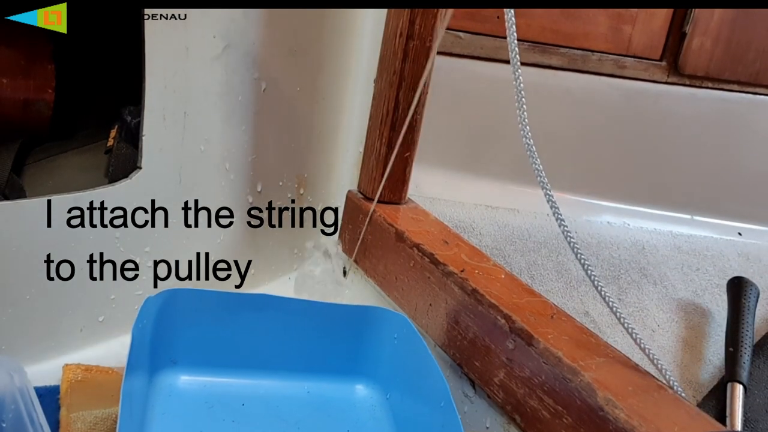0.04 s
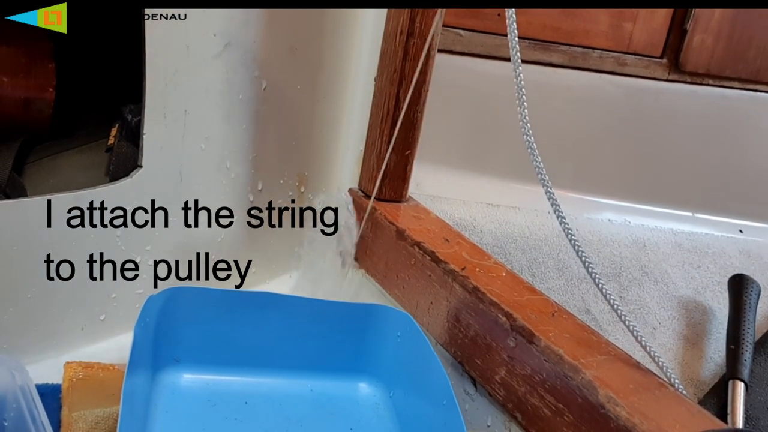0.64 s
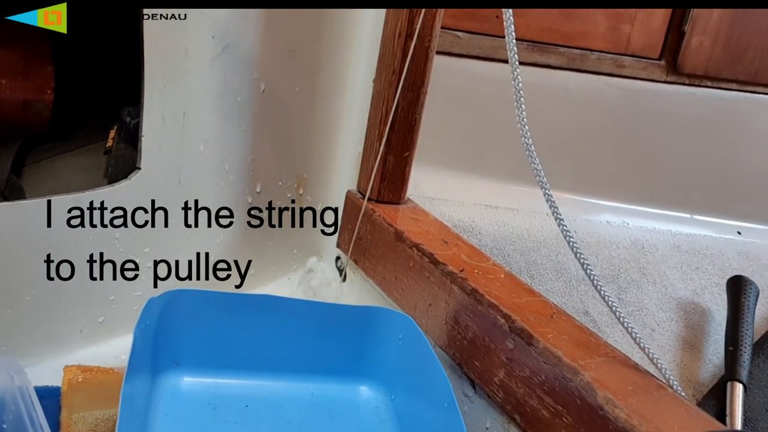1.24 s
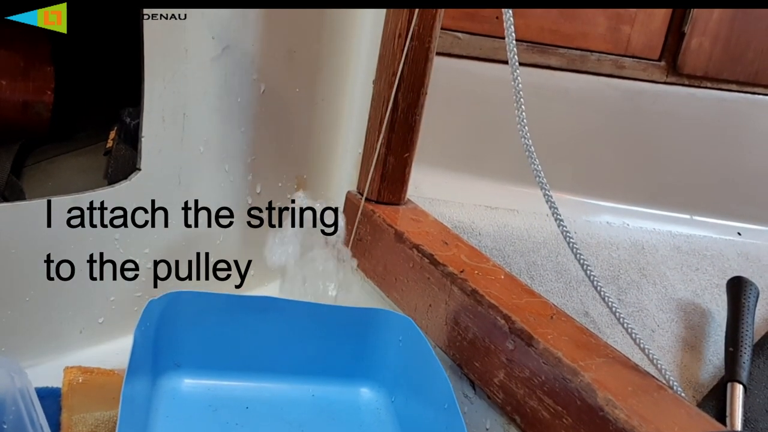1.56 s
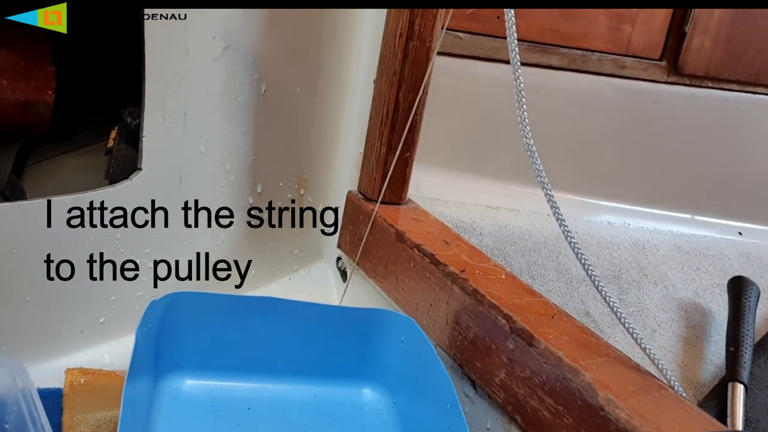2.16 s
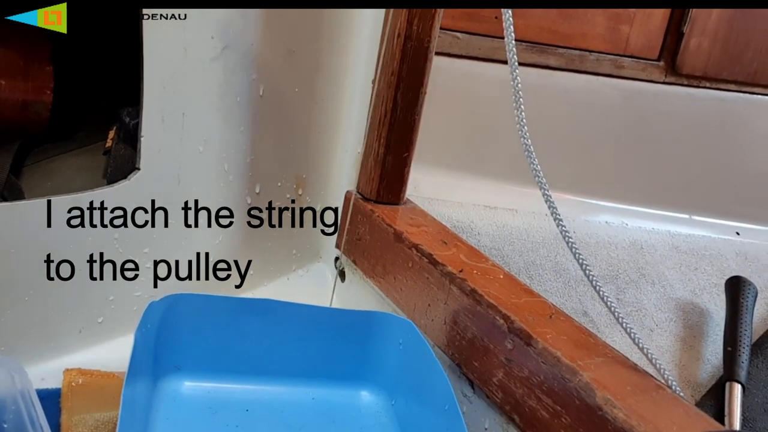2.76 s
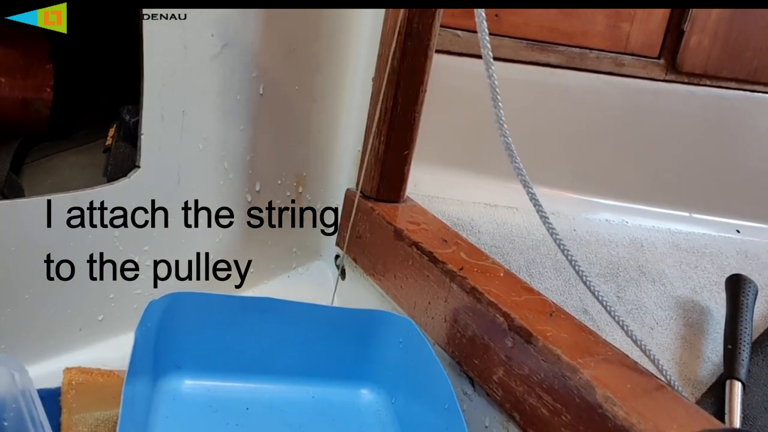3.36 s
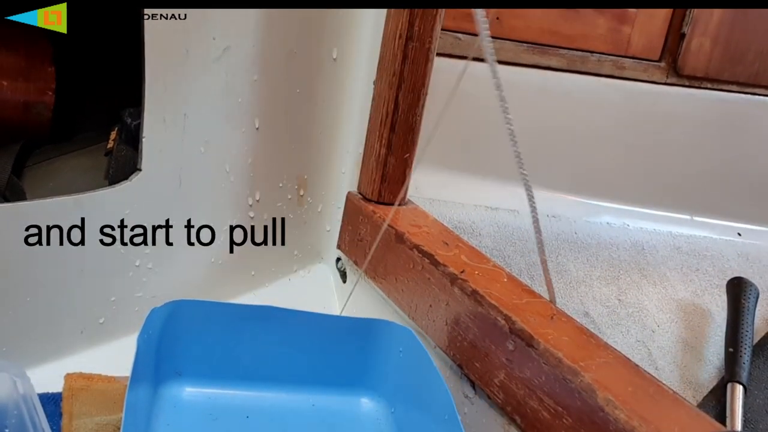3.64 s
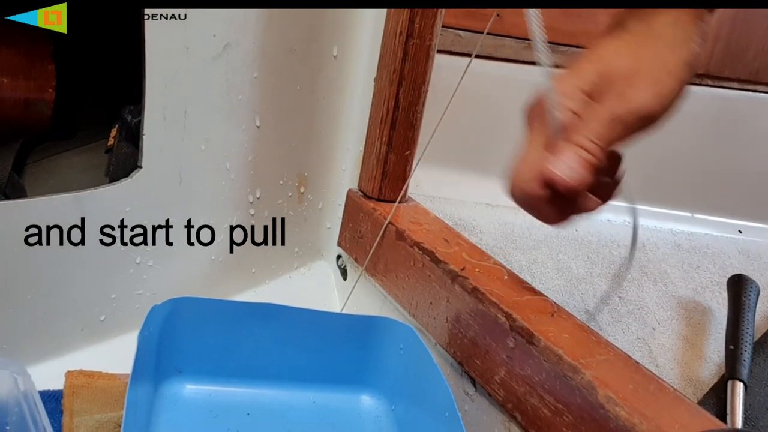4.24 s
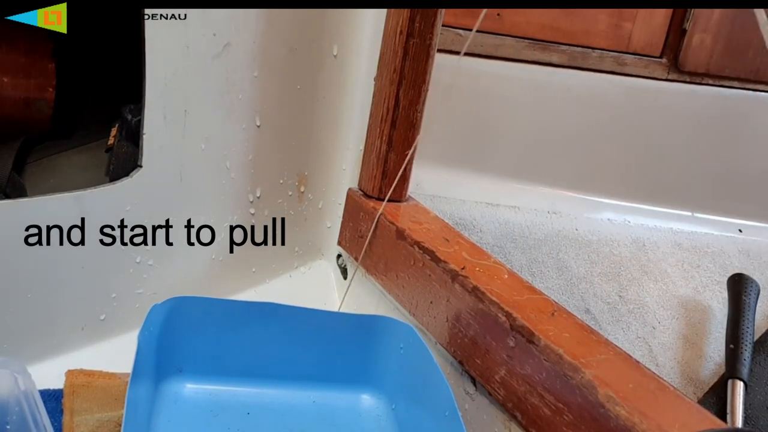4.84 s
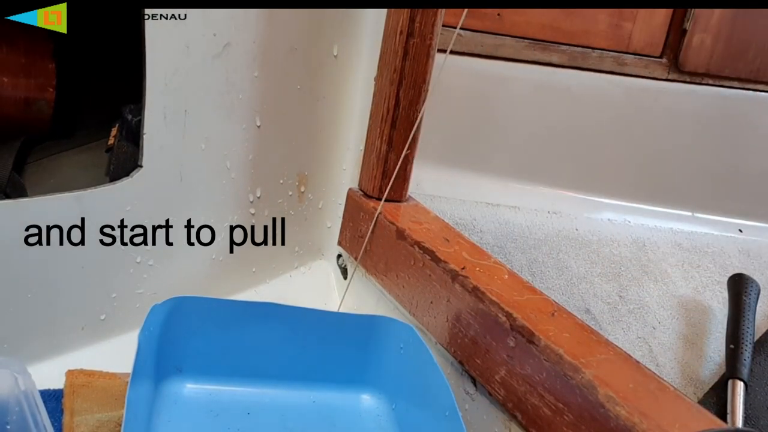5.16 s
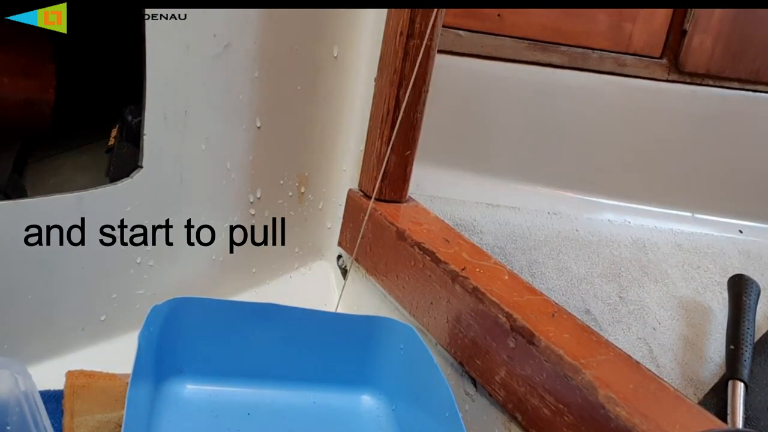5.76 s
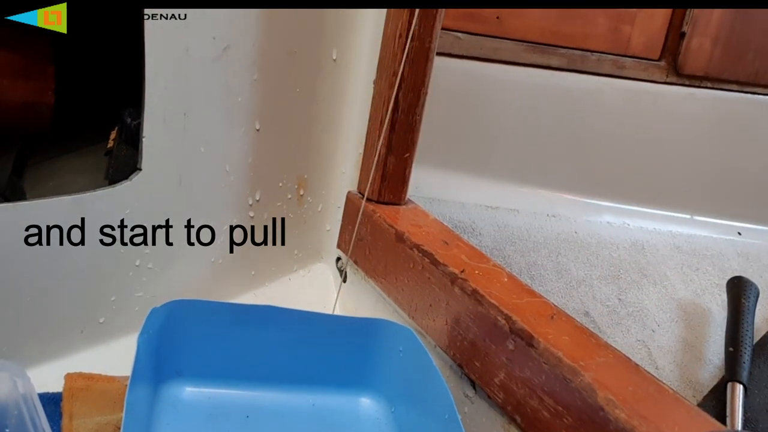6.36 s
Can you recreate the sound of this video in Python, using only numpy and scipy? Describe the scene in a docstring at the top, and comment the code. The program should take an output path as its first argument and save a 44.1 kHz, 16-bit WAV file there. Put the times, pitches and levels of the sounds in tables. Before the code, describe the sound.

Water spurts in through a small hole in a boat hull, splashing and bubbling, with two deep gulps, then thins to a spitting trickle and stops. A string is hauled over a pulley with a soft hiss, a low hum and small rattles, and snaps tight. A board creaks, and gear knocks on the woodwork with a deep thump. Everything is heard close up in a cramped cabin.

```python
"""Water spurts in through a small hole in a boat hull, with two deep gulps, and thins to a spitting trickle.
Its drops are noise impulses; the air it traps rings as bubbles. Then a string is hauled over a pulley:
friction makes it hiss and drives a drone in the hull. It snaps tight, a board creaks, and gear knocks
on the woodwork, exciting damped modes. All is heard close up, in stereo, in a cramped, hard-walled cabin."""
import sys
import numpy as np
from scipy import signal
from scipy.fft import rfft, irfft
from scipy.io import wavfile
from scipy.ndimage import uniform_filter1d

SR = 44100
rng = np.random.default_rng(int(sys.argv[2]) if len(sys.argv) > 2 else 0)


def master_out(mix):
    """Clip the mix to full scale and print it as 16-bit PCM to the path in sys.argv[1]."""
    frames = np.transpose(np.atleast_2d(mix))
    ceiling = np.clip(frames, -1, 1)
    pcm = np.round(ceiling * 32767).astype(np.int16)
    wavfile.write(sys.argv[1], SR, pcm)


N = 291060
TIME = np.arange(N) / SR

# the jet, dwindling from gush to trickle: time_s, spray_db, churn_db, bubble_pitch_hz
JET_FLOW = [(0, -42, -49, 1640), (0.32, -39, -38.5, 1414), (0.88, -47, -36.5, 1410),
            (0.98, -54, -51.5, 800), (1.25, -46.5, -42, 1197), (1.68, -42.5, -42.5, 1230),
            (1.87, -52, -56.5, 1220), (2.2, -43, -55, 1700), (2.32, -50.5, -70, 2650),
            (3.54, -48, -88, 2700), (3.63, -81, -58, 2800), (3.802, -77, -85, 2300)]
# the jet surges (+) or falters (-): start_s, length_s, change_db
JET_SURGES = [(0.32, 0.1, 5.5), (0.516, 0.019, -8.5), (0.623, 0.072, 7), (0.801, 0.12, 5),
              (1.284, 0.052, 4), (1.489, 0.24, 4), (1.678, 0.025, -6.5), (1.727, 0.04, 10),
              (1.778, 0.035, 0.5), (2.721, 0.06, -11), (2.973, 0.02, -5.5), (3.023, 0.043, -3.5),
              (3.113, 0.02, -6), (3.214, 0.065, -13)]
# spectrum of the spray: frequency_hz, level_db
SPRAY_SPECTRUM = [(880, -14.5), (1500, 13.5), (1670, -43.5), (1930, 13.5), (2110, -18), (2350, 16),
                  (3000, 0), (4080, 2), (8420, -6.5), (11000, -14.5), (14300, -48.5), (22000, -120)]
def inflow():
    """Drop impact and air entrainment: a stronger jet sprays harder and tears off smaller bubbles."""
    spray_db, churn_db, pitch_hz = curves(JET_FLOW)
    surge_db = sum(db * push(start, length, rise_s=0.017, t60=0.14) for start, length, db in JET_SURGES)
    spray_db += surge_db
    churn_db += 1.61 * surge_db
    pitch_hz *= 2 ** (0.24 * surge_db)

    drops = reflections(patter(per_s=280, spread_db=5, t60=0.024), echo_db=1)
    spray = steady(shaped(drops, SPRAY_SPECTRUM), 0.19)
    sharp_drops = reflections(patter(per_s=120, spread_db=11.5, t60=0.042), echo_db=-22.5)
    all_drops = unit(drops) + amp(-7) * unit(sharp_drops)
    mist = steady(shaped(all_drops, [(5000, -13.5), (8500, -4), (16000, -0.5)]), 0.22)
    wash = steady(shaped(drops, [(250, -26), (650, -4.5), (1400, 5.5), (2400, -16.5), (4000, -25)]), 0.096)

    churn = bubble_swarm(pitch_hz, per_s=160, octaves=0.589, cycles=35, max_rise=18, spread_db=21)
    churn = steady(cabin(churn, wet_db=-10.5), 0.045)
    fizz = bubble_swarm(np.full(N, 3650), per_s=520, octaves=0.9, cycles=60, max_rise=35, spread_db=22)
    fizz = steady(cabin(reflections(fizz, echo_db=-10), wet_db=-8), 0.1)
    pings = bubble_swarm(np.full(N, 8200), per_s=200, octaves=0.55, cycles=70, max_rise=20, spread_db=22)
    pings = steady(reflections(pings, echo_db=-10), 0.15)

    force = np.clip((spray_db + 49) / 12, 0, 1)  # a strong jet splashes steadily, a weak one spits
    spitting = force + (1 - force) * slugs(per_s=28, floor_db=-11, t60=0.09)
    water = amp(spray_db) * spitting * (amp(-13.5 + 5.3 * force) * spray + amp(1 - 3.7 * force) * fizz)
    water += amp(spray_db - 7 - 7.9 * force) * (mist + amp(-2) * pings)
    water += amp(churn_db) * (amp(-7.5) * wash + amp(-8) * churn)
    end_s = JET_FLOW[-1][0]
    return water * np.interp(TIME, [end_s, end_s + 0.05], [1, 0])


def slugs(per_s, floor_db, t60):
    """Jet break-up: a thin jet parts into slugs, and the gain jumps with each and sinks between them."""
    starts = np.cumsum(rng.uniform(0.35, 1.65, 400)) / per_s
    latest = np.maximum(np.searchsorted(starts, TIME) - 1, 0)
    strength = rng.uniform(0.17, 1, 400)[latest]
    return unit(amp(floor_db) + strength * ring(abs(TIME - starts[latest]), 0.0013, t60))


def bubble(hz, octaves_per_s, t60, swell_s, bearing, size=6000):
    """Bubble resonance: trapped air pulsates, and its pitch rises as it nears the surface."""
    t = TIME[:size]
    turns = np.cumsum(np.minimum(hz * 2 ** (octaves_per_s * t), SR / 2)) / SR
    stereo_phase = np.array([[1], [-1]]) * bearing * min(hz / 900, 1.5)
    return ring(t, swell_s, t60) * np.sin(2 * np.pi * turns + stereo_phase)


def bubble_swarm(pitch_hz, per_s, octaves, cycles, max_rise, spread_db):
    """Constant-Q damping: all bubbles ring for as many cycles, so the small, high ones die sooner."""
    out, end_s = np.zeros((2, N)), JET_FLOW[-1][0]
    for when, tone, strength, side, lift, chance in rng.random((3000, 6)):
        if chance < per_s * end_s / 3000:
            hz = pitch_hz[int(when * end_s * SR)] * 2 ** (octaves * (2 * tone - 1))
            note = bubble(hz, max_rise * lift, cycles / hz, 0.91 / hz, 2 * side - 1, size=3000)
            add(out, when * end_s, amp(spread_db * strength) * note)
    return out


# water washing against the hull: start_s, length_s, level_db
SLOSH_EVENTS = [(0.27, 0.5, -59), (1.49, 0.27, -56.5), (1.873, 0.22, -53), (2.366, 0.089, -49),
                (2.857, 0.039, -58), (3.441, 0.092, -49.5)]
# its spectrum: frequency_hz, level_db
SLOSH_SPECTRUM = [(70, -11.5), (120, -11), (200, 12), (260, -2), (450, -8), (800, -21.5), (1500, -54)]
def sloshes():
    """Amplitude-modulated noise: a low wash swells and fades as water meets the hull."""
    swell = sum(amp(db) * push(start, length, rise_s=0.055, t60=0.58) for start, length, db in SLOSH_EVENTS)
    return swell * noise(SLOSH_SPECTRUM)


# single large bubbles: start_s, level_db, pitch_hz, t60_s
LARGE_BUBBLES = [(0.188, -35, 1287, 0.06), (0.311, -11.5, 1075, 0.03), (0.349, -19, 1360, 0.035),
                 (0.448, -30.5, 635, 0.06), (0.635, -22, 1920, 0.03), (0.661, -22, 1180, 0.07),
                 (0.674, -24, 1400, 0.03), (0.822, -21.5, 1804, 0.055), (0.839, -26.5, 636, 0.022),
                 (0.892, -13.5, 1160, 0.025), (0.917, -22, 822, 0.04), (0.975, -36, 730, 0.03),
                 (1.045, -36, 680, 0.04), (1.102, -30.5, 674, 0.055), (1.126, -34.5, 643, 0.08),
                 (1.15, -28, 1370, 0.06), (1.163, -29.5, 916, 0.048), (1.19, -29, 1300, 0.038),
                 (1.228, -38, 1320, 0.037), (1.259, -28, 698, 0.043), (1.393, -28.5, 1185, 0.025),
                 (1.491, -26.5, 1102, 0.06), (1.53, -21.5, 705, 0.04), (1.602, -36, 1272, 0.03),
                 (1.623, -25, 1375, 0.037), (1.666, -15, 635, 0.04), (1.829, -22.5, 805, 0.028),
                 (1.887, -33, 1193, 0.037), (1.98, -27, 701, 0.095), (2.225, -33.5, 720, 0.08)]
def plops():
    """Free oscillation: each large bubble rings out as one damped, rising note."""
    out = np.zeros((2, N))
    for start, db, hz, t60 in LARGE_BUBBLES:
        note = bubble(hz, octaves_per_s=11, t60=t60, swell_s=2.1 / hz, bearing=rng.uniform(-1.1, 1))
        add(out, start, amp(db - 2) * note)
    return out


def splat(hz, octaves, t60=0.075, count=7):
    """Impact and entrainment: a slap of band noise traps a handful of ever fainter bubbles."""
    def band(f):
        return (1 / (1 + (np.log2(f / hz) / octaves) ** 4) + amp(-20)) / (1 + (900 / f) ** 2)
    out = amp(-12.5) * burst(band, 0.00061, t60)
    for k, (when, tone, bearing) in enumerate(rng.uniform(-1.2, 1, (count, 3))):
        delay_s = max(k + 0.5 * when, 0) / count * t60 * 0.59
        pitch_hz = hz * 2 ** (0.8 * octaves * tone * min(k, 1))  # the first bubble sits at the centre
        note = bubble(pitch_hz, octaves_per_s=28, t60=95 / pitch_hz, swell_s=0.00064, bearing=bearing)
        add(out, delay_s, amp(-9 - 4.7 * k) * note)
    return out


# slaps of water, from broad smacks to pitched drips: start_s, level_db, centre_hz, width_octaves
WATER_SLAPS = [(0.2388, -36, 2577, 0.6), (0.3294, -33, 2240, 0.69), (0.349, -22, 2100, 0.56),
               (0.389, -19.5, 3850, 0.55), (0.5577, -15.5, 2200, 0.85), (0.5964, -16, 5300, 1),
               (0.7485, -21, 3280, 0.54), (0.8676, -23.5, 2550, 0.65), (0.8843, -14.5, 2440, 0.42),
               (1.3176, -35, 2030, 0.26), (1.5287, -16.5, 2170, 0.97), (1.717, -19.5, 2280, 0.55),
               (1.7374, -14.5, 2600, 0.78), (1.7606, -12.5, 3005, 0.67), (1.8279, -26, 1450, 0.76),
               (2.0243, -29.5, 2450, 1), (2.086, -25, 1820, 0.39), (2.1356, -28, 2510, 0.55),
               (2.1812, -23, 2230, 0.72), (2.263, -26.5, 3500, 0.75), (2.3757, -41, 2360, 0.48),
               (2.424, -31.5, 3300, 0.25), (2.53, -29, 2560, 0.29), (2.56, -25, 3280, 0.28),
               (2.592, -43.5, 1090, 0.95), (2.602, -27, 7300, 0.5), (2.6413, -27, 3200, 0.6),
               (2.7621, -28, 3730, 0.22), (2.791, -27.5, 3700, 0.54), (2.8683, -31.5, 6300, 0.2),
               (2.9326, -18.5, 3160, 0.95), (2.996, -37, 3580, 0.66), (3.0258, -26, 4850, 0.43),
               (3.087, -30.5, 2060, 1), (3.115, -43.5, 1075, 0.82), (3.152, -21, 2825, 0.69),
               (3.184, -24, 4370, 0.31), (3.263, -28, 4400, 1), (3.2782, -27, 2670, 0.54),
               (3.33, -31.5, 3620, 1), (3.375, -33.5, 2000, 0.45), (3.439, -30.5, 5650, 0.54)]
# single drops striking hard: start_s, level_db
HARD_DROPS = [(1.344, -21.5), (1.529, -20), (1.831, -25), (2.032, -30.5), (2.355, -37), (2.374, -29),
              (2.577, -26), (2.995, -31), (3.278, -26.5), (3.524, -51)]
def splashes():
    """Impact noise: slaps of water sound in a band, hard drops as bright, high-passed bursts."""
    out = np.zeros((2, N))
    for start, db, hz, octaves in WATER_SLAPS:
        add(out, start, amp(db) * splat(hz, octaves))
    for start, db in HARD_DROPS:
        add(out, start, amp(db - 4.5) * burst(lambda f: 1 / (1 + (4810 / f) ** 2), 0.0008, t60=0.042))
    return out


# air gulped through the hole: start_s, level_db, first_hz, last_hz, t60_s
AIR_GULPS = [(1.527, -18.5, 681, 192, 0.14), (2.02, -20.5, 454, 191.5, 0.15)]
def gulps():
    """Cavity resonance: the air pocket grows, so its note falls, amid a burst of low noise."""
    out, t = np.zeros((2, N)), TIME[:SR // 2]
    for start, db, first_hz, last_hz, t60 in AIR_GULPS:
        turns = np.cumsum(last_hz + (first_hz - last_hz) * np.exp(-t / 0.005)) / SR
        add(out, start, amp(db - 5.5) * ring(t, 0.0082, t60) * np.sin(2 * np.pi * turns))
        add(out, start, amp(db - 8) * burst(lambda f: 1 / (1 + np.log2(2 * f / first_hz) ** 4), 0.0055, t60))
    return out


# pulls on the string: start_s, length_s, hiss_db, drone_db, rasp_db, hum_db
STRING_PULLS = [(3.6, 0.22, -72, -73, -77, -70), (3.841, 0.18, -60.5, -56, -67.5, -58.5),
                (4.251, 0.099, -50, -58, -67.5, -51), (4.341, 0.11, -53.5, -52, -59.5, -35.5),
                (4.435, 0.23, -46.5, -43.5, -61.5, -35), (4.642, 0.25, -54.5, -52.5, -55.5, -47.5),
                (4.893, 0.16, -50.5, -43, -63, -48), (5.007, 0.22, -48, -38, -61, -41),
                (5.239, 0.037, -60, -45, -47, -48), (5.314, 0.14, -61, -52.5, -67, -59.5),
                (5.428, 0.23, -68, -57.5, -80, -68), (5.661, 0.13, -69, -43, -61.5, -51),
                (5.94, 0.2, -68, -52, -63, -46)]
# spectrum of the rubbing contact: frequency_hz, level_db
HISS_SPECTRUM = [(1470, -21), (2500, -14), (3460, -5.5), (3660, -11), (4440, 2.5), (5310, -6.5),
                 (6810, -10.5), (7470, -6), (10000, -14), (11700, -7), (12800, -6.5), (14100, -7.5),
                 (16000, -4)]
# spectrum of the hull driven by the string: frequency_hz, level_db
DRONE_SPECTRUM = [(60, -32.5), (80, -40), (93, -7.5), (112, 5), (140, -11), (174, 3.5), (205, -1),
                  (260, -9.5), (330, -18), (430, -15.5), (600, -26.5), (1000, -30), (2000, -58)]
# modes of the pulley block: frequency_hz, bandwidth_hz, level_db
PULLEY_MODES = [(760, 12, 5), (1412, 88, 5), (1890, 120, -0.5), (2490, 140, 5.5), (2773, 56, 12),
                (3340, 20, -16), (3336, 54, 9.5), (4020, 240, 2.5), (4800, 230, 0.5), (6150, 72, -22),
                (6180, 480, -1.5)]
def string():
    """Friction and forced vibration: the string hisses, rasps in the pulley and sets the hull droning."""
    f = bins(N)
    hiss_gain, drone_gain, rasp_gain, hum_gain = sum(
        amp(levels_db)[:, None] * push(start, length, rise_s=0.39 * length, t60=0.16)
        for start, length, *levels_db in STRING_PULLS)
    hiss = np.zeros((2, N))
    for centre_hz in (4500, 8500, 13000):  # each part of the contact catches in its own way
        grip = steady(reflections(patter(per_s=810, spread_db=3.5, t60=0.018), echo_db=-10.5), 0.15)
        band = np.exp(-((f - centre_hz) / 3300) ** 2) * amp(lookup(HISS_SPECTRUM, f))
        hiss += np.linalg.norm(band) * stereo_filter(grip, band) * wander(depth_db=5, size=2400)
    rasp = amp(1) * rasp_gain * stereo_filter(grip, response(PULLEY_MODES, f) / (1 + (f / 3500) ** 2))
    drone = drone_gain * noise(DRONE_SPECTRUM)
    return amp(1.5) * hiss_gain * unit(hiss) + rasp + drone + braid(hum_gain)


def braid(effort):
    """Periodic excitation: the braid bumps over the pulley and hums, higher and louder with effort."""
    bump_hz = 86.4 + 2.95 * effort / effort.max()
    turns = np.cumsum(bump_hz * wander(depth_db=0.2, size=1500)) / SR
    return effort * sum(amp(db) * wander(depth_db=2.5, size=2000) * np.sin(2 * np.pi * harmonic * turns)
                        for harmonic, db in enumerate([0, -3, -18], 1))


# the string snaps tight: start_s, level_db, t60_s, tilt_db_per_octave
STRING_SNAPS = [(4.91, -16, 0.051, 3), (6.478, -20, 0.032, 7.5)]
# spectrum of a snap: frequency_hz, level_db
SNAP_SPECTRUM = [(590, -50), (1000, -27), (1370, -14), (1690, -14), (2330, -9), (2710, -5), (3270, -3.5),
                 (4360, -5), (5020, -4.5), (5970, -2), (7880, -9.5), (8550, -14.5), (9170, -13),
                 (13800, -16.5), (16000, -23)]
def snaps():
    """Impulsive loading: sudden tension in the string gives a brief broadband click."""
    out = np.zeros((2, N))
    for start, db, t60, tilt in STRING_SNAPS:
        def spectrum(f):
            return amp(lookup(SNAP_SPECTRUM, f) + tilt * np.log2(np.maximum(f, 1200) / 4000))
        add(out, start, amp(db + 2.5) * burst(spectrum, 0.00028, t60))
    return out


# the pulley block rattles: start_s, level_db, tilt_db_per_octave
BLOCK_RATTLES = [(3.469, -41.5, -12), (3.525, -22.5, 16), (3.537, -29.5, -3.5), (3.602, -38.5, -1.5),
                 (3.646, -41.5, 1.5), (4.343, -28.5, 4), (4.522, -29.5, -5.5), (4.753, -36, 3),
                 (4.809, -27, 4.5), (5.138, -34, 10), (5.172, -36, -14), (5.267, -31.5, -5),
                 (5.277, -31.5, -1.5), (5.387, -39, 3.5), (5.418, -43, -18.5), (5.598, -49.5, 0.5)]
def rattles():
    """Modal filtering: each small impact takes on the resonances of the pulley block."""
    out = np.zeros((2, N))
    for start, db, tilt in BLOCK_RATTLES:
        def spectrum(f):
            return response(PULLEY_MODES, f) * amp(tilt * np.log2(np.clip(f, 1200, 7000) / 3000))
        add(out, start, amp(db - 9) * burst(spectrum, 0.0017, t60=0.081))
    return out


# blows on the woodwork, from water or gear: start_s, level_db, t60_s, tilt_db_per_octave
WOOD_KNOCKS = [(1.529, -17.5, 0.1, -3.5), (1.665, -8.5, 0.031, 3.5), (6.407, -23, 0.094, -3),
               (6.416, -13.5, 0.11, -4), (6.429, -24, 0.37, -9), (6.502, -25.5, 0.094, -4)]
# modes of the panels: frequency_hz, bandwidth_hz, level_db
PANEL_MODES = [(271, 140, -5), (427, 28, -4), (770, 30, 1), (778, 43, 0), (971, 37, 4), (1250, 90, -5),
               (1384, 200, -5), (1940, 140, -13), (2580, 500, -68.5)]
def knocks():
    """Plate resonance: a blow excites all the damped modes of the wooden panels at once."""
    out = np.zeros((2, N))
    for start, db, t60, tilt in WOOD_KNOCKS:
        def spectrum(f):
            panel = response(PANEL_MODES, f) / (1 + (f / 5000) ** 2)
            return panel * amp(tilt * np.log2(np.maximum(f, 200) / 800))
        add(out, start, amp(db - 3.5) * burst(spectrum, 0.00093, t60))
    return out


# things scuff as they slide: start_s, level_db, centre_hz
SLIDING_SCUFFS = [(3.87, -61, 5000), (5.69, -55.5, 750), (5.76, -52, 740), (6.2, -60.5, 6000),
                  (6.33, -60, 1490), (6.438, -44, 6570), (6.529, -60, 2480)]
# the string squeaks thinly: start_s, level_db, pitch_hz
STRING_SQUEAKS = [(4.08, -68.5, 1990), (4.485, -44.5, 12800), (4.6, -49, 12800), (5.03, -45, 4250),
                  (5.086, -37, 13100), (5.179, -38, 12800), (5.345, -52, 12900), (5.5, -68, 12900)]
def scuffs_and_squeaks():
    """Sliding friction: a broad band of noise is heard as a scuff, a narrow one as a squeak."""
    out = np.zeros((2, N))
    def slide(events, octaves, swell_s, t60):
        for start, db, hz in events:
            rub = burst(lambda f: 1 / (1 + (np.log2(f / hz) / octaves) ** 2), swell_s, t60)
            add(out, start, amp(db) * rub)
    slide(SLIDING_SCUFFS, octaves=2.3, swell_s=0.036, t60=0.23)
    slide(STRING_SQUEAKS, octaves=0.036, swell_s=0.028, t60=0.058)
    return out


# separate slips of a board: start_s, level_db
BOARD_SLIPS = [(5.924, -42.5), (5.933, -29.5), (5.972, -37), (6.004, -31.5), (6.033, -34), (6.062, -31),
               (6.088, -29), (6.103, -49)]
# modes of that board: frequency_hz, t60_s, level_db
BOARD_MODES = [(729, 0.094, -0.5), (772, 0.1, -10), (998, 0.051, -1), (1200, 0.032, -11.5),
               (1515, 0.033, -14), (2090, 0.027, -22)]
def creak():
    """Stick-slip motion: each slip rings the board a little differently, with a short scratch on top."""
    out, t = np.zeros((2, N)), TIME[:16384]
    scratch_hz_db = [(200, 3.5), (450, -8.5), (850, 0.5), (1400, -7.5), (3200, -7), (7000, -17), (14000, -41)]
    for start, db in BOARD_SLIPS:
        note = 0
        for hz, t60, mode_db in BOARD_MODES:
            detune = rng.uniform(0.95, 1.05)
            phase = rng.uniform(-1.26, 2.8, (2, 1))
            note += amp(mode_db) * ring(t, 0.0033, t60) * np.sin(2 * np.pi * hz * detune * t + phase)
        scratch = burst(lambda f: amp(lookup(scratch_hz_db, f)), 0.0019, t60=0.085)
        add(out, start, amp(db) * (amp(-6) * note + amp(-9) * scratch))
    return out


# the hull rumbles more once the hauling starts: time_s, level_db
RUMBLE_LEVEL = [(0, -53.5), (3.6, -54), (3.85, -59), (4.45, -46), (5.2, -43.5), (5.6, -55.5), (5.78, -43.5),
                (6.6, -46)]
# spectrum of the rumble: frequency_hz, level_db
RUMBLE_SPECTRUM = [(20, -22), (39, -1.5), (65, -0.5), (95, 0), (135, -17.5), (200, -25), (300, -53),
                   (500, -85.5)]
# deep thumps: start_s, level_db, pitch_hz, swell_s, t60_s
HULL_THUMPS = [(0.698, -39, 79.4, 0.023, 0.23), (1.536, -29.5, 104.7, 0.0044, 0.28),
               (2.03, -36.5, 107.6, 0.0064, 0.47), (3.937, -36, 84, 0.027, 0.19),
               (5.714, -19, 70, 0.061, 0.24), (6.427, -6.5, 76, 0.0091, 0.12),
               (6.518, -15.5, 72.7, 0.006, 0.83)]
def hull():
    """Structure-borne sound: the hull rumbles, and each thump, whether a gulp of water booming against it or
    shifting weight, rings two inharmonic low modes."""
    out = amp(curves(RUMBLE_LEVEL)[0]) * noise(RUMBLE_SPECTRUM)
    t = TIME[:SR]
    for start, db, hz, swell_s, t60 in HULL_THUMPS:
        modes = np.sin(2 * np.pi * hz * t) + amp(-11.5) * np.sin(2 * np.pi * hz * 1.56 * t)
        add(out, start, amp(db) * ring(t, swell_s, t60) * modes)
    return out


# still air in the cabin: frequency_hz, level_db
AIR_SPECTRUM = [(60, -23.5), (130, 1), (270, -1.5), (600, -25), (800, -22), (1700, -27), (4400, -20),
                (14000, -30), (16000, -36.5)]
def still_air():
    """Ambient noise floor: faint, steady and strongest in the bass."""
    return amp(-63) * noise(AIR_SPECTRUM)


# reverberation time of the cabin: frequency_hz, t60_s
CABIN_DECAY = [(200, 0.057), (1000, 0.12), (4000, .13), (14000, 0.032)]
def cabin(x, wet_db):
    """Reverberation: the walls add a short diffuse tail, each band decaying at its own rate."""
    hz, t, spectra = signal.stft(rng.standard_normal((2, SR // 3)), SR, nperseg=256)
    decay = amp(-60 * t / lookup(CABIN_DECAY, hz + 1)[:, None])
    tail = signal.istft(spectra * decay, SR, nperseg=256)[1]
    tail = stereo_filter(tail, 1) * np.minimum(TIME[:tail.shape[1]] / 0.0027, 1)
    return x + amp(wet_db) * signal.fftconvolve(x, tail / np.linalg.norm(tail[0]), axes=1)[:, :N]


def reflections(x, echo_db, count=7):
    """Comb filtering: early echoes from nearby surfaces interfere, differently in each channel."""
    lags = (rng.uniform(0.0006, 0.011, (2, count)) * SR).astype(int)
    echoes = np.array([sum(np.roll(channel, lag) for lag in row) for channel, row in zip(x, lags)])
    return (x + amp(echo_db) * echoes) / np.sqrt(1 + count * amp(2 * echo_db))


# likeness of left and right: frequency_hz, correlation
STEREO_COHERENCE = [(100, 0.98), (280, 0.77), (550, 0.32), (1100, 0.042), (16000, 0.032)]
def stereo_filter(x, gain):
    """Spatial coherence: two unrelated signals become a filtered pair, rms 1, that agrees in the bass."""
    a, b = rfft(x)
    correlation = lookup(STEREO_COHERENCE, bins(x.shape[1]))
    mid, side = a * np.sqrt(1 + correlation), b * np.sqrt(1 - correlation)
    return unit(irfft(np.array([mid + side, mid - side]) * gain, x.shape[1]))


def shaped(x, spectrum):
    """Spectral shaping by rows of frequency_hz, level_db."""
    return stereo_filter(x, amp(lookup(spectrum, bins(N))))


def noise(spectrum):
    """Stationary stereo noise with a given spectrum."""
    return shaped(rng.standard_normal((2, N)), spectrum)


def burst(gain_at, swell_s, t60, size=16384):
    """Scattering: close walls turn a blow into dense, dying noise with a given spectrum."""
    return stereo_filter(rng.standard_normal((2, size)), gain_at(bins(size))) * ring(TIME[:size], swell_s, t60)


def patter(per_s, spread_db, t60):
    """Shot noise: tiny impacts arrive at random, each a puff of noise."""
    arrivals = rng.random(N) < per_s / SR
    impacts = arrivals * amp(spread_db * np.minimum(rng.exponential(1, N), 4))
    power = signal.oaconvolve(impacts ** 2, ring(TIME[:3000], 0.00026, t60) ** 2)[:N]
    return np.sqrt(abs(power)) * rng.standard_normal((2, N))


def response(modes, f):
    """Modal superposition: the damped modes of a solid, summed in power."""
    return np.sqrt(sum(amp(2 * db) / (1 + ((f * f - hz * hz) / (f * width)) ** 2) for hz, width, db in modes))


def ring(t, swell_s, t60):
    """Exponential decay after a smooth swell to 1."""
    attack = np.sin(np.pi / 2 * np.minimum(t / max(swell_s, 1e-4), 1)) ** 2
    return attack * 1000 ** (-np.maximum(t - swell_s, 0) / t60)


def push(start, length, rise_s, t60):
    """Envelope of a sustained drive: it swells, holds to the end of its length, then decays."""
    t = TIME - start
    return np.sin(np.pi / 2 * np.clip(t / rise_s, 0, 1)) ** 2 * 1000 ** (-np.maximum(t - length, 0) / t60)


def wander(depth_db, size):
    """Random modulation: a factor that drifts around 1 over `size` samples."""
    drift = uniform_filter1d(uniform_filter1d(rng.standard_normal(N), size), size // 2)
    return amp(depth_db * unit(drift))


def steady(x, span_s):
    """Division by the running rms takes the slow drift out of a swarm and keeps its grain."""
    power = uniform_filter1d((x ** 2).mean(0), int(span_s * SR) + 1)
    return x / np.sqrt(abs(power) + 1e-3 * np.mean(x ** 2))


def amp(db):
    """Decibels to gain."""
    return 10 ** (np.asarray(db) / 20)


def unit(x):
    """Scales to rms 1."""
    return x / np.sqrt(np.mean(x ** 2) + 1e-20)


def bins(size):
    """Spectrum frequencies, raised 1 Hz to avoid zero."""
    return np.fft.rfftfreq(size, 1 / SR) + 1


def lookup(points, hz):
    """Interpolates a table on a log-frequency axis."""
    f, value = np.transpose(points)
    return np.interp(np.log(hz), np.log(f + 1), value)


def curves(rows):
    """The columns of a timed table at every sample."""
    times, *columns = np.transpose(rows)
    return [np.interp(TIME, times, column) for column in columns]


def add(mix, start_s, sound):
    """Mixes a sound in at start_s."""
    part = mix[:, round(start_s * SR):][:, :sound.shape[-1]]
    part += sound[..., :part.shape[1]]


def scene():
    """Superposition of water, gear, hull and still air; brief sounds excite the cabin's reverberation."""
    jet = inflow() + sloshes()
    bubbles, slaps, air = plops(), splashes(), gulps()
    water = jet + cabin(bubbles, wet_db=-6.5) + cabin(slaps, wet_db=-32.5) + cabin(air, wet_db=-1.5)
    hauling, clicks, blows = string(), snaps() + rattles(), knocks()
    gear = hauling + cabin(clicks, wet_db=-12) + cabin(blows, wet_db=-10.5)
    gear += scuffs_and_squeaks() + cabin(creak(), wet_db=-29)
    return water + gear + hull() + still_air()


def record(dry):
    """Sensitivity and bandwidth: the right channel is slightly louder, and both end at 16.1 kHz."""
    low_pass = signal.firwin(511, 16100, window=("kaiser", 9), fs=SR)
    return signal.oaconvolve(dry * amp([[-0.3], [0.3]]), low_pass[None], "same")


dry = scene()
out = record(dry)
master_out(out)
```